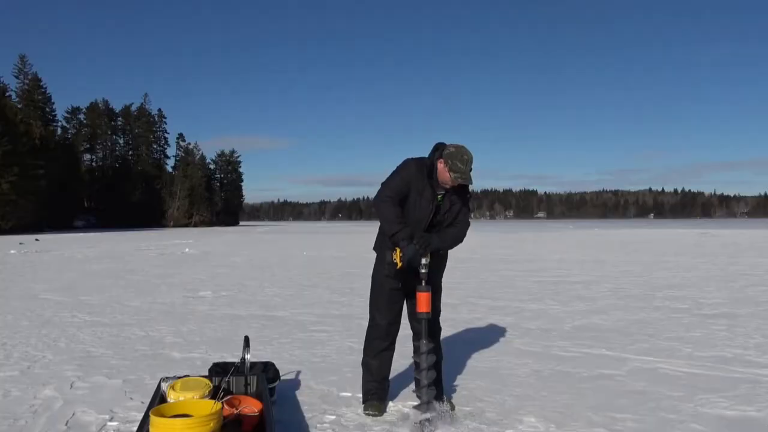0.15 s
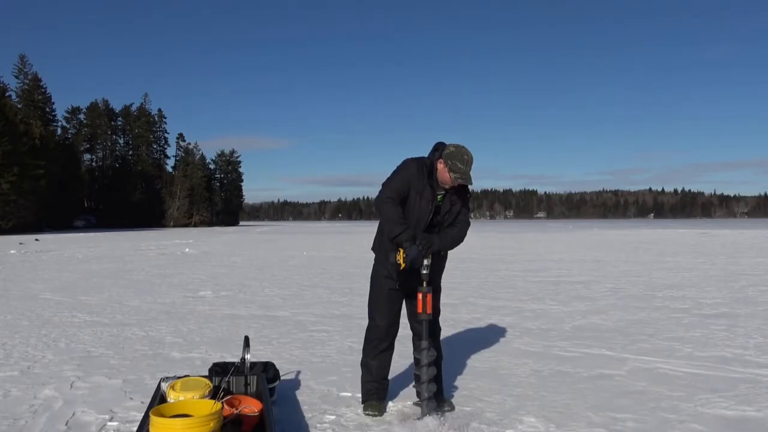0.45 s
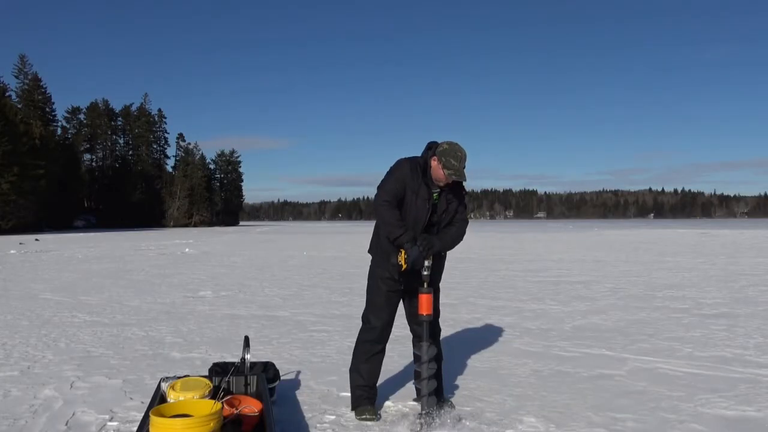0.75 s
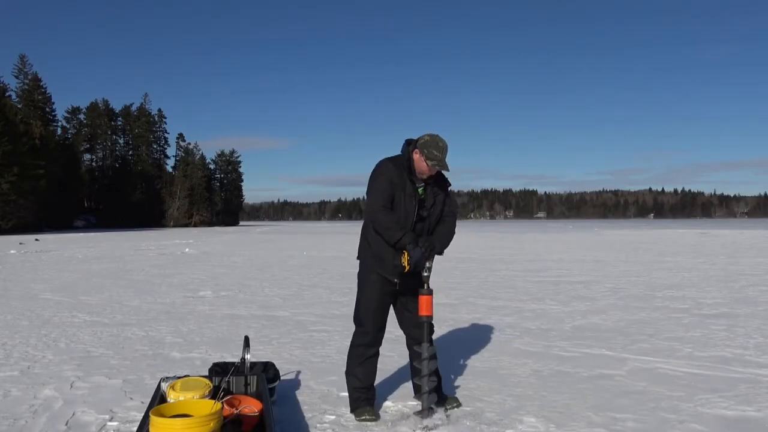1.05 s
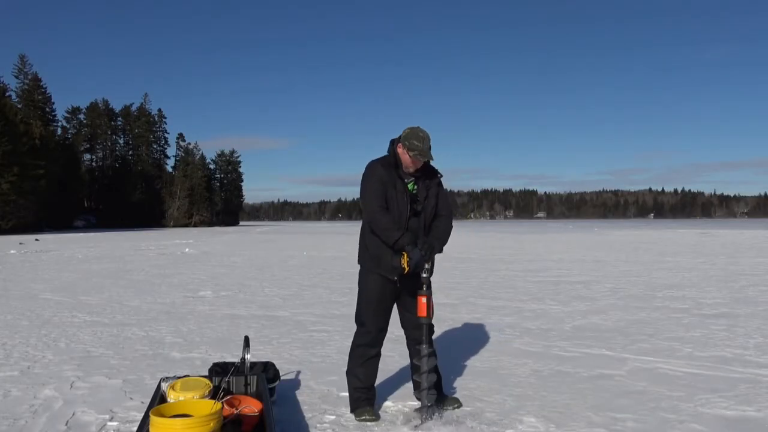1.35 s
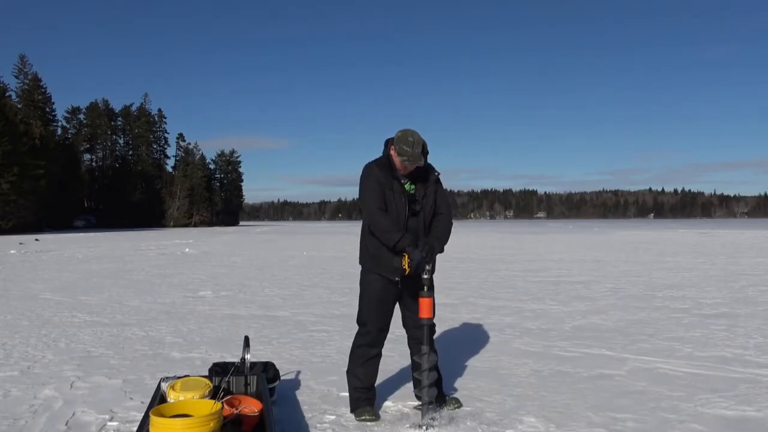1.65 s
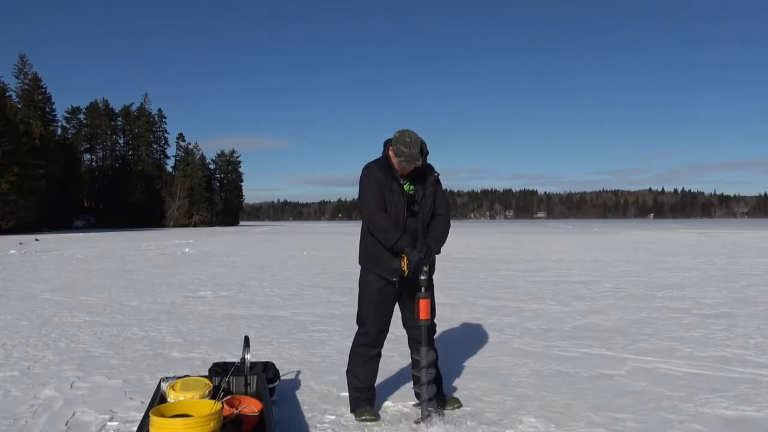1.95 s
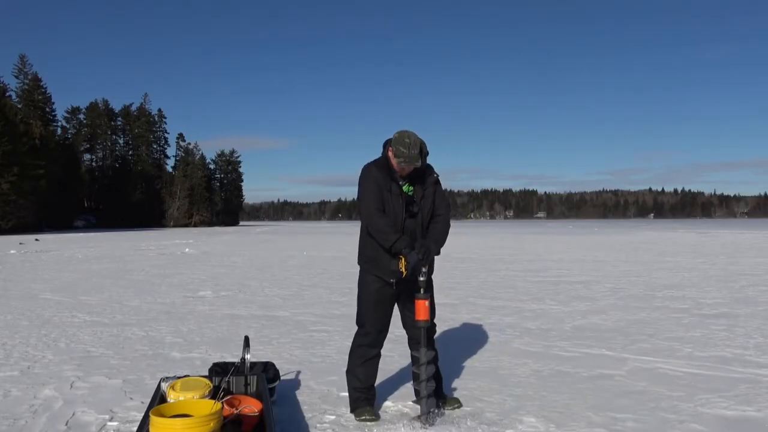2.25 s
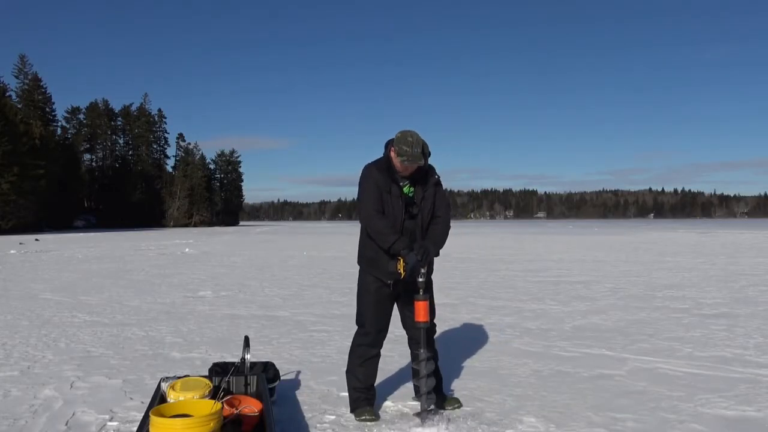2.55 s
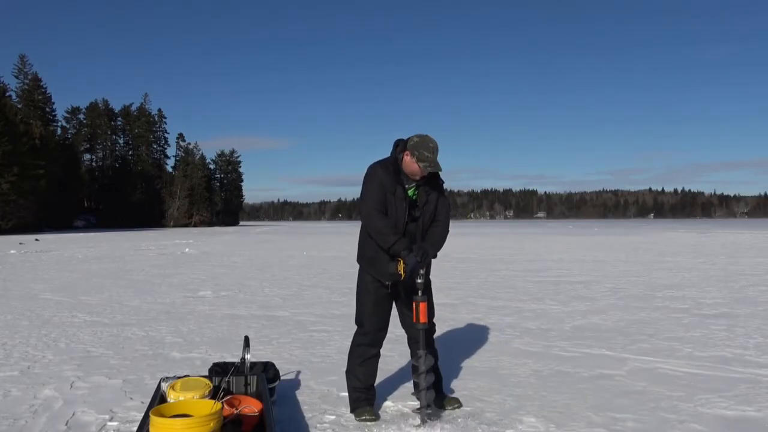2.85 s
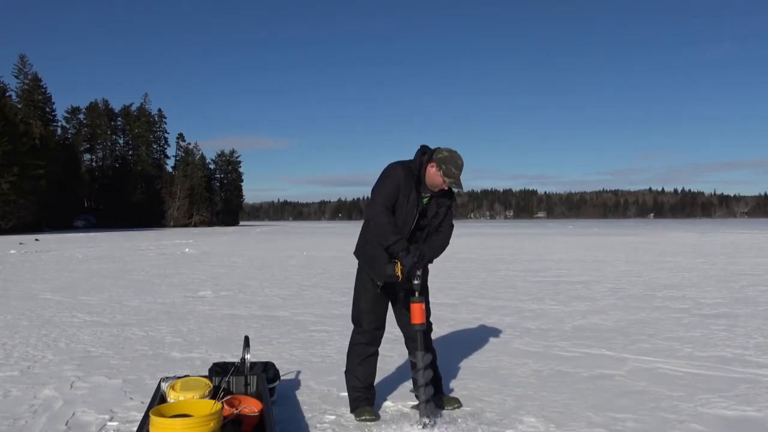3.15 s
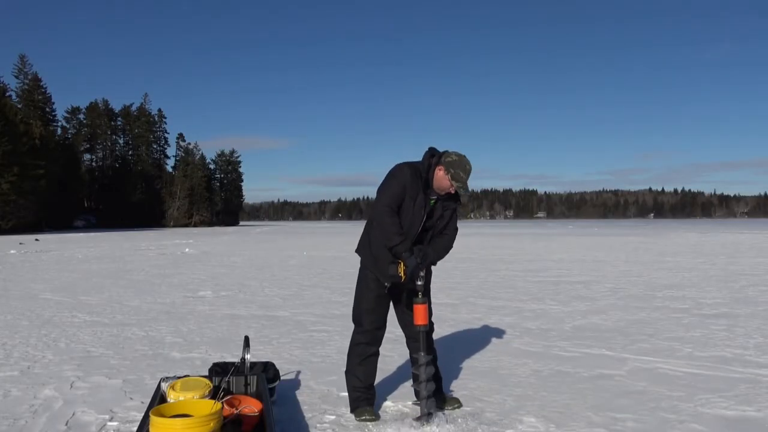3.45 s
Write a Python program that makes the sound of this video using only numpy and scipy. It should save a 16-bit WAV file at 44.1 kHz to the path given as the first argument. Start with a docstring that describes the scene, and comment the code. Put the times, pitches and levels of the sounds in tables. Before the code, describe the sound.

A cordless drill turns an ice auger, grinding steadily into lake ice with a rough whine.

```python
"""Drilling lake ice

Out in the open, the microphone a few metres from a cordless drill turning a two-blade auger into the ice.
Chips breaking at the blades excite fixed resonances and hiss, each band swelling with the shaft, under the
drill's rough gear tone near 1.3 kHz. The level jumps up after a low thump and later drops out briefly."""
import sys
import numpy as np
from scipy import signal
from scipy.fft import rfft, irfft, next_fast_len
from scipy.io import wavfile
from scipy.ndimage import uniform_filter1d, map_coordinates

SR = 44100
rng = np.random.default_rng(int(sys.argv[2]) if len(sys.argv) > 2 else 0)


def file_out(sig):
    """Save sig as 16-bit WAV at sys.argv[1]."""
    # one column per channel
    cols = np.atleast_2d(sig).T
    # limit, then scale
    lim = np.clip(cols, -1, 1)
    pcm = np.round(lim * 32767).astype(np.int16)
    wavfile.write(sys.argv[1], SR, pcm)


N = 158760

# swell with the shaft: f/Hz, once-a-turn depth/dB, its phase/turns, twice-a-turn depth/dB, its phase/cycles
SHAFT_SWELL = [(90.0, 9, 0.68, 4, 0.6), (230.0, 0.5, 1, 4.6, 0.07), (480.0, 1.8, 0.7, 2.1, 0.47),
               (845, 1, 0.21, -0.1, 0.93), (1320, 1.9, 0.6, 2.7, 0.26), (1850, 2.06, 0.8, 1.7, 0.07),
               (2780, 0.8, 0.51, 0.75, 0.27), (3470, 0.5, 0.6, 2.2, 0.47), (4220, 0.15, 0.67, 0, 0.86),
               (5630, 2.2, 0.67, 1.6, 0.93), (7400, 1.7, 0.45, 1.94, 0.3), (8500, 1.5, 0.57, 2.1, 0.5),
               (10680.0, 0.2, 0.6, -0.1, 0.3), (13640.0, 0.62, 0.61, 0.15, 0.56)]
# course of the grind: t/s, relative level/dB, relative treble/dB
GRIND_LEVELS = [(0.06, -16.5, -2.5), (0.09, -23, -17), (0.1, -17.5, -5), (0.18, -17, -23), (0.22, -19, -17),
                (0.36, -17.5, -17), (1.16, -18.5, -18.5), (1.19, -15.5, -17), (1.21, -19.5, -18),
                (1.37, -18, -20), (1.41, -19.5, -13), (1.46, -17.5, -23), (1.53, -22, -19),
                (1.58, -17.5, -15), (1.64, -21, -24), (1.7, -22, -14), (1.75, -18.5, -21),
                (1.88, -19.5, -16), (1.91, -16.5, -22), (1.96, -22, -17), (1.98, -20, -12),
                (2.07, -16.5, -19), (2.08, -23.5, -14), (2.13, -19, -18), (2.15, -23, -13),
                (2.19, -17.5, -19), (2.25, -20.5, -21), (2.32, -18.5, -13), (2.41, -18.5, -22),
                (2.43, -21.5, -12), (2.45, -19.5, -18), (2.56, -18.5, -18), (2.99, -18, -19.5),
                (3.08, -19, -18), (3.13, -18, -19), (3.22, -19.5, -17), (3.25, -23, -10),
                (3.29, -16.5, -18), (3.36, -20, -17), (3.38, -20, -12), (3.47, -19.5, -21),
                (3.53, -21, -17), (3.59, -15, -21), (3.6, -25, -18)]
# bass over the rest of the grind: t/s, level/dB
GRIND_BASS = [(.06, 13), (.13, 3), (.2, -2.5), (2.2, 1), (3.6, 4)]
# broad colour of the grind: f/Hz, relative level/dB
GRIND_COLOUR = [(25, -38), (60, -45), (130, -22), (300, -23), (600, -15), (700, -10.5), (1050, -14.5),
                (1700, -12), (2200, -12.5), (3900, -14), (5700, -18.5), (8700, -21), (9800, -35.5),
                (10600, -29), (13800, -32), (14500, -26), (16000, -44)]
# resonances of auger and drill: f/Hz, width/Hz, boost midway/dB, drift/(dB/s),
# full beat depth/dB, beats a turn, beat phase/cycles
RESONANCES = [(832, 52, 13, 1, 5.5, 2, 0.97), (1270, 946, 13, 0, -2, 2, 0.29),
              (3440, 200, 5, -1, -0.5, 2, 0.44), (2640, 200, 5, 1.8, 6, 1, .24),
              (4300, 800, 3.3, .7, 5.8, 2, .82), (5220, 210, 3.5, -0.9, 0.5, 2, 1),
              (6250, 110, 0, -2.5, 7.5, 2, 0), (7330, 900, 6.5, 0.5, 1, 1, 0.85),
              (11330, 880, 5, -0.5, 2, 2, 0.6)]
# pitch of the gear mesh, following motor speed: t/s, f/Hz
GEAR_PITCH = [(0.06, 1348), (0.13, 1316), (0.15, 1450), (0.21, 1270), (0.24, 1360), (0.31, 1312),
              (0.45, 1423), (0.47, 1340), (0.56, 1290), (0.63, 1410), (0.66, 1260), (0.75, 1361),
              (0.94, 1350), (0.95, 1240), (0.98, 1440), (1.11, 1287), (1.18, 1450), (1.2, 1255),
              (1.46, 1383), (1.48, 1267), (1.59, 1415), (1.62, 1309), (2.01, 1337), (2.04, 1260),
              (2.06, 1460), (2.12, 1270), (2.16, 1377), (2.26, 1291), (2.37, 1405), (2.4, 1270),
              (2.45, 1356), (2.64, 1330), (2.67, 1440), (2.69, 1280), (2.72, 1357), (2.94, 1377),
              (2.97, 1289), (3.0, 1400), (3.13, 1433), (3.19, 1330), (3.29, 1432), (3.37, 1330),
              (3.57, 1417), (3.6, 1328)]
# strength of the gear tone: t/s, level before GEAR_TRIM_DB/dB
GEAR_LEVEL = [(0.06, -21.5), (0.12, -13.5), (0.46, -16.5), (0.72, -13.5), (0.81, -19.5), (0.86, -15.5),
              (1.6, -12), (2.78, -15.5), (3.36, -13), (3.4, -30), (3.43, -9), (3.6, -20.5)]
# gear whines: multiple of the gear tone's pitch, width/Hz, level/dB
GEAR_WHINES = [(6.55, 250, -42), (10, 350, -45)]
# high ping at the start: t/s, level/dB
PING_LEVEL = [(.057, -39), (.072, -48), (.093, -48), (.098, -27), (.125, -28), (.15, -70)]
# lumps of ice on the flights: t/s, level/dB, f/Hz
ICE_KNOCKS = [(0.79, -38, 549), (0.957, -26, 412), (1.423, -31, 549), (2.012, -24, 390), (2.627, -21, 530),
              (2.705, -22, 417), (3.086, -17, 549), (3.161, -29, 436), (3.207, -14, 520),
              (3.231, -14.5, 517), (3.386, -14.5, 553), (3.398, -16, 320)]
# sound the two sides of the microphone do not share: f/Hz, relative level/dB
UNSHARED_LEVEL = [(60, -22), (200, -18), (400, -21), (700, -31), (1400, -29), (3000, -24), (8000, -20),
                  (14000, -14)]
# balance at the microphone: f/Hz, left over right/dB
BALANCE = [(60, -.3), (1300, -.3), (2400, -1.5), (4400, -1.9), (8100, -1.6), (12000, -.3)]

THUMP_DB, THUMP_HZ, THUMP_CROSSING_S = -17, 20, .0315
TURNS_PER_S, BEAT_FULL_S = 5.45, 2.3
CHIPS_PER_S, CHIP_SPREAD_DB = 1500, 3.5
SQUEAK_COUNT, SQUEAK_DB, SQUEAK_S = 1200, -10, .022
SQUEAK_HZ, SQUEAK_SPREAD_OCTAVES, SQUEAK_GLIDE = 4500, .75, .08
GEAR_WIDTH_HZ, GEAR_WANDER_HZ, GEAR_TRIM_DB = 110, 12, -1.2
START_S, LEAD_IN_DB = .0568, -11
GAP_S, GAP_RISE_S = 2.0792, .009
TIME = np.arange(N) / SR


def amp(db):
    """Gain for a level in dB."""
    return 10 ** (np.asarray(db) / 20)


def unit(x):
    """The signal at rms 1."""
    return x / np.sqrt(np.mean(x ** 2) + 1e-20)


def at_frequency(rows, hz):
    """A table's columns after f/Hz, read on a log axis."""
    f, *columns = np.transpose(rows)
    return np.squeeze([np.interp(np.log(hz + 1), np.log(f + 1), c) for c in columns])


def at_time(rows, t=TIME):
    """A table's columns after t/s, read at times t."""
    times, *columns = np.transpose(rows)
    return np.squeeze([np.interp(t, times, c) for c in columns])


def wobble(knots_per_s):
    """A smooth random curve."""
    return map_coordinates(rng.standard_normal(400), [TIME * knots_per_s])


def filtered(x, response):
    """The signal through a complex response(hz)."""
    size = next_fast_len(N + SR // 2)
    return irfft(rfft(x, size) * response(np.fft.rfftfreq(size, 1 / SR)), size)[..., :N]


def minimum_phase(db):
    """The causal response with these levels."""
    cepstrum = irfft(np.log(amp(db)))
    half = len(cepstrum) // 2
    return np.exp(rfft(np.concatenate([cepstrum[:1], 2 * cepstrum[1:half]]), len(cepstrum)))


def narrow_band(source, pitch_hz, width_hz):
    """A narrow band of the source that follows pitch_hz, at rms 1."""
    carrier = np.exp(2j * np.pi * np.cumsum(pitch_hz) / SR)
    pole = np.exp(-np.pi * width_hz / SR)
    wide = signal.lfilter([1], [1, -pole ** 3], source / carrier)
    narrow = signal.lfilter([1], [1, -pole], wide)
    return unit((narrow * carrier).real)


def thump():
    """One slow, low thump, as from wind on the microphone, on both sides and slightly louder on the left."""
    phase = np.clip(2 * np.pi * THUMP_HZ * (TIME - THUMP_CROSSING_S), -np.pi / 2, np.pi)
    return -np.sin(phase) * amp([[THUMP_DB + .6], [THUMP_DB - .6]])


def crackle(click_share):
    """Random clicks of uneven size over scraping noise, as of ice breaking at the blades."""
    hits = rng.random(N) < CHIPS_PER_S / SR
    sizes = amp(CHIP_SPREAD_DB * rng.standard_normal(N))
    clicks = unit(hits * sizes * rng.choice([-1, 1], N))
    scrape = rng.standard_normal(N)
    return np.sqrt(click_share) * clicks + np.sqrt(1 - click_share) * scrape


def blade_squeaks():
    """The blades squeak: brief tones at scattered pitches, each sliding up or down."""
    start = rng.integers(0, N, (SQUEAK_COUNT, 1))
    pitch, glide, size = rng.standard_normal((3, SQUEAK_COUNT, 1))
    samples = np.arange(round(SQUEAK_S * SR))
    progress = samples / len(samples)
    centre_hz = np.clip(SQUEAK_HZ * 2 ** (SQUEAK_SPREAD_OCTAVES * pitch), 300, 15000)
    hz = centre_hz * (1 + SQUEAK_GLIDE * glide * (progress - .5))
    envelope = amp(2 * size) * np.sin(np.pi * progress) ** 2
    tones = envelope * np.sin(2 * np.pi * np.cumsum(hz, axis=1) / SR)
    return amp(SQUEAK_DB) * unit(np.bincount((start + samples).ravel(), tones.ravel(), N)[:N])


def shaft_beat(t, per_turn, phase=0):
    """A cosine locked to the shaft, its phase in cycles."""
    return np.cos(2 * np.pi * (per_turn * TURNS_PER_S * t - phase))


def shaft_swell_db(hz, t):
    """Each band swells once and twice a turn as the two blades go round."""
    bands = [once_db * shaft_beat(t, 1, once_phase) + twice_db * shaft_beat(t, 2, twice_phase)
             for _, once_db, once_phase, twice_db, twice_phase in SHAFT_SWELL]
    band_hz = np.transpose(SHAFT_SWELL)[0]
    return at_frequency(np.column_stack([band_hz, bands]), hz).T


def resonances_db(hz, t):
    """Fixed resonances of auger and drill; their beat with the shaft deepens until BEAT_FULL_S."""
    depth = np.minimum(t / BEAT_FULL_S, 1)
    total_db = 0
    for centre_hz, width_hz, boost_db, drift, beat_db, per_turn, phase in RESONANCES:
        beat = depth * shaft_beat(t, per_turn, phase)
        peak_db = boost_db + drift * (t - t.mean()) + beat_db * beat
        total_db += peak_db / (1 + (2 * (hz - centre_hz) / width_hz) ** 2)
    return total_db


def contour_db(hz, t):
    """The grind rises and falls; bass and treble also take their own course."""
    level_db, treble_db = at_time(GRIND_LEVELS, t)
    bass = at_time(GRIND_BASS, t) / (1 + (hz / 550) ** 4)
    treble = (treble_db - treble_db.mean()) / (1 + (9500 / (hz + 1)) ** 12)
    return level_db - level_db.mean() + bass + treble


def grind(cutting):
    """The cutting noise, coloured by the turning auger and flickering in random patches."""
    hz, t, spectrum = signal.stft(cutting, SR, nperseg=512, noverlap=384)
    patches = uniform_filter1d(rng.standard_normal(spectrum.shape), size=9, axis=0)
    patches = unit(uniform_filter1d(patches, size=14, axis=1))
    gain_db = shaft_swell_db(hz, t) + 0.82 * patches
    gain_db += resonances_db(hz[:, None], t) + contour_db(hz[:, None], t)
    turning = signal.istft(spectrum * amp(gain_db), SR, nperseg=512, noverlap=384)[1][:N]
    coloured = filtered(turning, lambda f: minimum_phase(at_frequency(GRIND_COLOUR, f)))
    level_db = at_time(GRIND_LEVELS)[0].mean() + 3 + 0.4 * wobble(15)
    return amp(level_db) * unit(coloured)


def gear_tone(grit, gear_hz):
    """The drill's rough gear tone near 1.3 kHz, wavering with motor speed."""
    return amp(at_time(GEAR_LEVEL) + GEAR_TRIM_DB) * narrow_band(grit, gear_hz, GEAR_WIDTH_HZ)


def gear_whines(grit, gear_hz, sway=.02):
    """Whines at multiples of the gear tone's smoothed pitch, swaying with each turn."""
    smooth_hz = uniform_filter1d(gear_hz, size=SR // 3)
    base_hz = smooth_hz * (1 + sway * (shaft_beat(TIME, 1) + wobble(9) / 2))
    return sum(amp(db + 2 * wobble(12)) * narrow_band(grit, multiple * base_hz, width_hz)
               for multiple, width_hz, db in GEAR_WHINES)


def ping(grit, pitch_hz=11050):
    """A thin, high resonance sounds briefly at the start."""
    return amp(at_time(PING_LEVEL)) * narrow_band(grit, np.full(N, pitch_hz), width_hz=250)


def ice_knocks(width_hz=110):
    """Lumps of ice strike the auger's flights: dull, quickly damped knocks."""
    knocks, t = np.zeros(N + SR), np.arange(SR // 10) / SR
    decay = np.exp(-np.pi * width_hz * t)
    for start_s, db, hz in ICE_KNOCKS:
        knocks[round(start_s * SR):][:len(t)] += amp(db) * decay * np.sin(2 * np.pi * hz * t)
    return knocks[:N]


def microphone_pair(drill, decay_s=.03):
    """The drill sits a little to the right, with a faint scatter that the two sides do not share."""
    scatter = rng.standard_normal(1300) * amp(-60 * TIME[:1300] / decay_s)
    scattered = signal.fftconvolve(drill, scatter / np.linalg.norm(scatter))[:N]
    unshared = filtered(scattered, lambda hz: amp(at_frequency(UNSHARED_LEVEL, hz)))
    pair = np.array([drill + unshared, drill - unshared])
    return filtered(pair, lambda hz: amp(np.outer([.5, -.5], at_frequency(BALANCE, hz))))


def scene():
    """Drilling a few metres off; the level jumps up after a thump, and later all sound drops out briefly."""
    grinding = grind(crackle(click_share=0.31) + blade_squeaks())
    grit = crackle(click_share=0.1)
    gear_hz = at_time(GEAR_PITCH) + GEAR_WANDER_HZ * wobble(24.89)
    drill = grinding + gear_tone(grit, gear_hz) + gear_whines(grit, gear_hz) + ping(grit) + ice_knocks()
    lead_in = np.where(TIME < START_S, amp(LEAD_IN_DB), 1)
    dropout = np.where(TIME < GAP_S, 1, np.clip((TIME - GAP_S) / GAP_RISE_S, 0, 1))
    return thump() + lead_in * dropout * microphone_pair(drill)


def record(dry):
    """Behind the microphone, peaks are softly rounded and the highest treble is cut off."""
    ceiling, cutoff_hz = 1.05, 15750
    rounded = dry / (1 + np.abs(dry / ceiling) ** 4) ** (1 / 4)
    return filtered(rounded, lambda hz: hz < cutoff_hz)


dry = scene()
out = record(dry)
file_out(out)
```